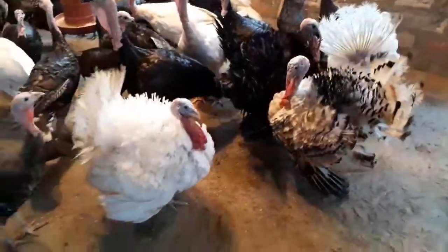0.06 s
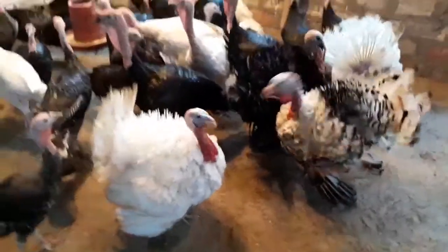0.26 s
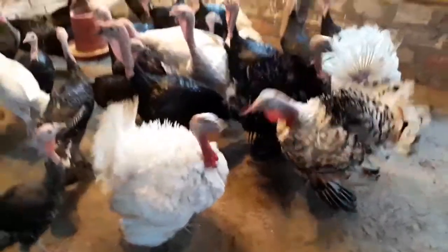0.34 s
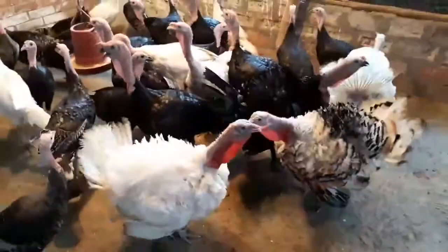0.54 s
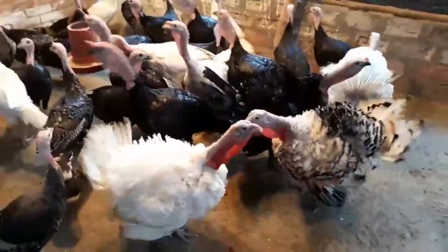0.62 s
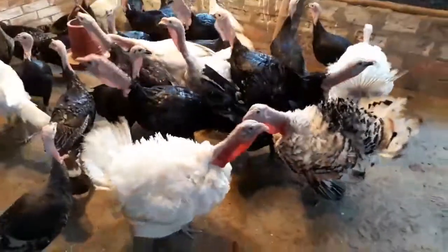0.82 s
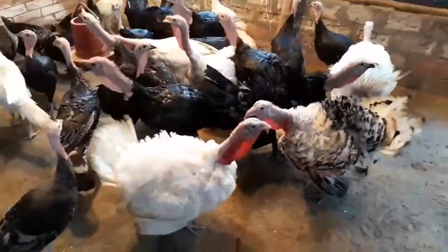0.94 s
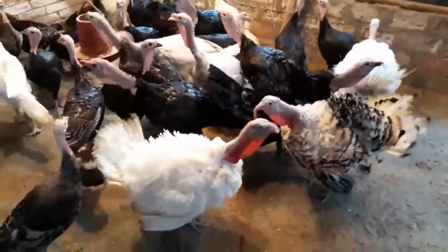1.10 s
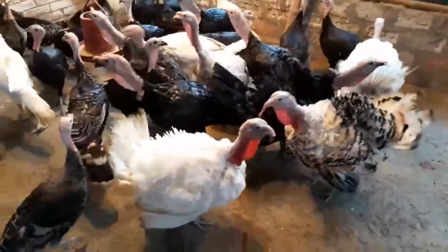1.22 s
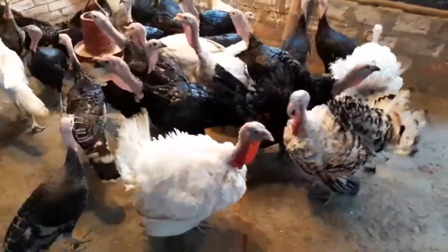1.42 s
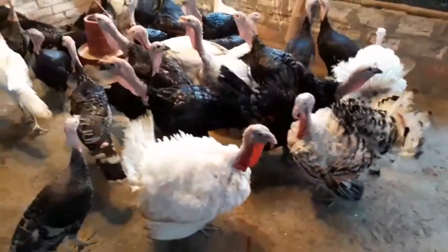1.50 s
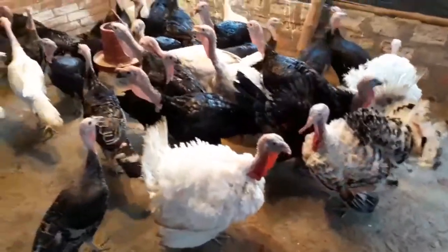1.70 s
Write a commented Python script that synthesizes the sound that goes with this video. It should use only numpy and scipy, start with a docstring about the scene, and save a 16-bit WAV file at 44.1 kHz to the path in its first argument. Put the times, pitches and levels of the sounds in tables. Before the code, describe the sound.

A turkey hen whines softly with tiny peeps, then several toms erupt into fast, nasal, overlapping gobbles with a raspy edge, gradually thinning out and ringing in a hard-walled brick shed, heard from close by.

```python
"""Brick shed with a flock of turkeys. A hen whines softly, then several toms burst into gobbling at once:
short, nasal, overlapping syllables at neighbouring pitches that fade and ring out in the shed.
Toms are gliding harmonic stacks; the flock is many random stacks with breath noise and rasping treble.
Whine and peeps are swept tones; rumble and floor are coloured noise, thuds decaying sines.
The shed's echo is decaying noise in octave bands."""
import sys
import numpy as np
from scipy import signal
from scipy.fft import rfft, irfft
from scipy.io import wavfile

SR = 44100
rng = np.random.default_rng(int(sys.argv[2]) if len(sys.argv) > 2 else 0)


def transcribe(signal):
    """Save signal, clipped to [-1, 1], as a 16-bit WAV file at the path in sys.argv[1]."""
    frames = np.atleast_2d(signal).T
    limited = np.clip(frames, -1, 1)
    pcm = np.round(limited * 32767).astype(np.int16)
    wavfile.write(sys.argv[1], SR, pcm)


N = 77175
TIME_S = np.arange(N) / SR

# Low rumble that swells with the gobbling: start_s, level_db
RUMBLE_LEVEL = [(0, -56), (.15, -52), (.3, -43), (.5, -42), (.9, -43), (1.2, -43), (1.55, -47), (1.75, -54)]
# Rumble spectrum: frequency_hz, relative_level_db
RUMBLE_SPECTRUM = [(15, -45), (25, -19), (49, -20.5), (112, -1.5), (187, -13), (247, -3), (300, -6.5),
                   (335, -9.5), (460, -6.5), (600, -37), (1010, -120)]
# Dull thuds: start_s, pitch_hz, level_db (before the soft onset), t60_s
THUDS = [(.48, 106, -18.5, 0.093), (.915, 250, -22.5, 0.18), (.28, 290, -21.5, 0.17)]
# Spectrum of the shed's faint noise: frequency_hz, relative_level_db
FLOOR_SPECTRUM = [(60, -22), (150, -8.5), (280, -4.5), (460, -12.5), (1100, -11.5), (3100, -29),
                  (7000, -27.5), (15600, -45)]
# Echo decay: frequency_hz, t60_s
SHED_DECAY = [(300, 0.22), (700, 0.47), (1500, 0.46), (4000, 0.46), (12000, 0.2)]
# Hen's whine: start_s, pitch_hz, level_db
WHINE = [(0, 965, -32), (.03, 977, -45), (.07, 953.6, -26), (.11, 969, -45), (.15, 945.6, -22),
         (.162, 924, -48), (.175, 865, -22.5), (.19, 810, -39), (.2, 820, -42)]
# Whistled peeps: centre_s, length_s, pitch_hz, glide_hz_per_s, level_db
PEEPS = [(0.056, 0.028, 1397, 6000, -31.5), (.06, .04, 733, 3000, -46.5), (.06, .1, 2230, 3, -52),
         (.115, 0.02, 1160, 0, -34), (.12, 0.023, 2670, -2, -48), (.197, 0.013, 1552, -4, -25),
         (1.325, 0.024, 3500, 2, -34.5), (1.4, 0.014, 2463, 0, -34.5), (1.52, 0.016, 3460, 4, -40),
         (1.54, 0.027, 1079, 10, -35.5), (1.63, .05, 649.4, 0, -43.5)]
# Flock level, two successive runs: start_s, level_db, treble_relative_db
FLOCK_LEVEL_RUNS = [
    [(0.0, -46, 5), (0.016, -26.5, -24), (0.024, -44.5, -1), (0.06, -26, -27), (0.114, -40.5, 1.5),
     (0.176, -24.5, -25), (0.196, -15.5, -25), (0.224, -32, -12), (0.232, -12, -27), (0.24, -18, -27),
     (0.26, -15.5, -14), (0.308, -10.5, -20.5), (0.316, -10.5, -5.5), (0.34, -13, -3)],
    [(0.35, -23, -16), (0.384, -10, -11), (0.402, -14.5, -3.5), (0.548, -10, -7), (0.568, -9, -6),
     (0.582, -14, -14), (0.61, -6.5, -12.5), (0.848, -9.5, -13.5), (1.114, -14.5, -23.5),
     (1.22, -13, -25.5), (1.262, -28, -8), (1.28, -19.5, -19.5), (1.424, -22.5, -23.5), (1.456, -20.5, -35),
     (1.512, -31.5, -21), (1.62, -49, -26)],
]
# Spectrum of the flock's voices: frequency_hz, relative_level_db
FLOCK_SPECTRUM = [(450, -34), (560, -7.5), (700, -2.5), (950, 2), (1200, -0.5), (1500, -9.5), (1750, -14),
                  (2100, -8.5), (2800, -28.5), (4000, -40)]
# Spectral shaping of the rasp: frequency_hz, relative_level_db
RASP_SPECTRUM = [(1530, -6.5), (2600, 2), (3280, -11), (3990, 6.5), (4990, -4.5), (5380, 0), (7370, -17.5),
                 (15600, -34)]
# Clearest gobble syllables: centre_s, length_s, pitch_hz, glide_hz_per_s,
# fundamental_db, harmonic_2_db, harmonic_3_db, upper_harmonics_db
SYLLABLES = [(0.19, 0.03, 602, -2, -27.5, -50, -37, -50), (0.235, 0.025, 891, 998, -23, -38, -38, -67),
             (0.238, 0.03, 984, 700, -23, -28, -42, -65), (0.25, 0.035, 702, 500, -49, -26, -23.5, -45),
             (0.282, 0.025, 998, -1500, -24, -17.5, -57, -31),
             (0.283, 0.03, 838.5, -3000, -35, -16, -36, -55), (0.305, 0.025, 774, -2500, -45, -9, -23, -33),
             (0.315, 0.03, 1068, -2000, -14.5, -27, -52, -32),
             (0.315, 0.025, 710, -2500, -49, -16, -43, -59),
             (0.33, 0.04, 900.6, -9000, -13, -19, -49, -28.5),
             (0.335, 0.025, 820, -1000, -19.5, -38, -27.5, -37),
             (0.35, 0.035, 742, -2500, -17, -39, -45, -31.5),
             (0.375, 0.03, 768, -1000, -30, -29, -41, -34.5),
             (0.395, 0.035, 594.7, -400, -33, -25.5, -27, -35),
             (0.407, 0.025, 727.6, 400, -13, -18.5, -27, -48),
             (0.414, 0.03, 684.2, 1404, -14.5, -14.5, -21.5, -26.5),
             (0.438, 0.02, 685.8, -2, -10, -35, -12.5, -46), (0.449, 0.03, 588, 200, -19, -46, -24, -38),
             (0.45, 0.035, 754, 1200, -20.5, -22, -26.5, -28),
             (0.45, 0.045, 701, 696, -12.5, -27, -24, -55),
             (0.495, 0.03, 663.4, -200, -16.5, -25, -24, -52), (0.496, 0.045, 766, 804, -21, -17, -28, -34),
             (0.504, 0.06, 701, 200, -17.5, -24, -34, -35),
             (0.54, 0.045, 767.2, 308, -15.5, -20.5, -26.5, -30),
             (0.564, 0.025, 682.4, 0, -8.5, -18, -28, -50),
             (0.562, 0.045, 597.6, -100, -28.5, -20.5, -40, -35),
             (0.596, 0.025, 579, -1200, -44, -16, -22.5, -33),
             (0.611, 0.035, 682, 1000, -21, -17, -16.5, -51), (0.614, 0.03, 642, 0, -13.5, -13, -20.5, -39),
             (0.639, 0.07, 751.5, 204, -40, -21.5, -36, -51),
             (0.647, 0.045, 681.5, -300, -10.5, -27, -27, -33.5),
             (0.661, 0.025, 895, 404, -28, -17, -49, -29),
             (0.692, 0.045, 698.8, 498, -8.5, -19.5, -19.5, -36.5),
             (0.731, 0.065, 747, -2, -22, -26.5, -32, -42.5),
             (0.737, 0.03, 849.7, -1800, -11.5, -27, -51, -40),
             (0.761, 0.03, 559.3, 2105, -27.5, -15, -46, -36),
             (0.798, 0.04, 576, -500, -36, -15.5, -49, -39), (0.801, 0.045, 658, 12, -14, -22, -23, -53),
             (0.842, 0.04, 705.7, 605, -18.5, -22, -27, -58), (0.852, 0.035, 593, 400, -53, -20, -35, -70),
             (0.853, 0.06, 653.6, 892, -12, -19, -18.5, -32.5),
             (0.88, 0.025, 591, -2000, -20.5, -33, -46, -38.5),
             (0.883, 0.03, 769, 1202, -18, -21, -51, -34), (0.885, 0.05, 674, 5, -19, -22, -26, -37),
             (0.911, 0.04, 610, 1200, -25, -22, -29, -40),
             (0.92, 0.035, 657.3, -1100, -19.5, -43, -24, -50),
             (0.958, 0.05, 723, 1200, -27, -17.5, -30, -47), (0.96, 0.045, 680.4, 500, -27, -18, -31, -37),
             (0.985, 0.05, 661, 1200, -23.5, -30, -35, -73), (1.013, 0.035, 750, 300, -20.5, -26, -34, -62),
             (1.022, 0.03, 629.7, 408, -15, -33, -53, -37.5), (1.085, 0.03, 685, 303, -18.5, -45, -46, -44),
             (1.088, 0.035, 576, 600, -15.5, -27, -53, -45), (1.13, 0.03, 749, 0, -26, -41, -54, -62),
             (1.159, 0.03, 685.3, -100, -20.5, -50, -26.5, -39.5),
             (1.173, 0.06, 592, -300, -18, -20, -59, -41.5),
             (1.216, 0.045, 658.5, -1500, -18, -50, -55, -43.5), (1.255, 0.03, 685, -3, -38, -44, -48, -50),
             (1.28, 0.025, 688, -800, -20, -50, -44, -60), (1.299, 0.04, 576, -400, -20.5, -30.5, -57, -47),
             (1.304, 0.03, 775, -1700, -18.5, -33, -50, -69), (1.332, 0.03, 554, -1000, -28, -40, -37, -48),
             (1.334, 0.045, 666, -1100, -24, -34, -43, -58), (1.39, 0.04, 606, -2, -47, -29, -61, -51.5),
             (1.442, 0.03, 568, -500, -25, -35, -69, -71),
             (1.457, 0.025, 659.4, -1200, -15, -60, -29.5, -46),
             (1.473, 0.035, 576, -8, -25.5, -32.5, -72.5, -49.5),
             (1.5, 0.045, 651, -300, -40, -59, -46, -53.5), (1.519, 0.025, 572.5, -400, -40, -37, -44, -55)]
# Throat colour of harmonics 4 and up: frequency_hz, relative_level_db
THROAT_SPECTRUM = [(2000, 19.5), (2800, -4), (4000, -1.5), (5400, -5), (7000, -16), (9000, -21),
                   (15500, -30)]

FLOOR_DB, SHED_DB, SHED_GAP_S = -54, -8, 0.0094
THUD_ONSET_S = 0.018
RISE_PER_LENGTH, FALL_PER_LENGTH = 0.6, 0.82
WHINE_JITTER_RATIO, WHINE_SHIMMER_DB, WHINE_OVERTONES_DB = 0.008, 1.5, -26
WHINE_FADE_S = 0.023
FLOCK_PITCH_HZ, FLOCK_SAG_HZ_PER_S, FLOCK_PITCH_LOG_SPREAD = 759.8, 110, 0.14
FLOCK_RATE_PER_S, FLOCK_SYLLABLE_S, FLOCK_GLIDE_SPREAD_HZ_PER_S = 70, 0.04, 1000
FLOCK_VOICES_DB, FLOCK_SPREAD_DB, FLOCK_FADE_S = -9, 2.5, 0.05
VOICE_BREATH_RATIO, RASP_BREATH_RATIO = 0.45, 0.45
RASP_DB, RASP_FLUTTER_DB, RASP_FLUTTER_HZ = -7, 2.5, 4.2
GRIT_DB, GRIT_HZ = 3, 150
JITTER_RATIO, SHIMMER_DB, SHIMMER_HZ, UPPER_SCATTER_DB = 0.006, 1.8, 90, 3
THROAT_LOW_HZ, BASS_CUT_HZ, TOP_CUT_HZ = 500, 25, 15750
PEAK_LIMIT = 0.92


def from_db(db):
    """Decibels to gain."""
    return 10 ** (np.asarray(db) / 20)


def rms_one(x):
    """Scale to rms 1."""
    return x / np.sqrt(np.mean(x ** 2) + 1e-20)


def in_time(rows):
    """Interpolate each table column to a curve per sample."""
    start_s, *columns = np.transpose(rows)
    return [np.interp(TIME_S, start_s, column) for column in columns]


def at_hz(points, hz):
    """Interpolate a spectrum or decay table on a log-frequency axis."""
    points_hz, values = np.transpose(points)
    return np.interp(np.log(hz), np.log(points_hz), values)


def coloured(x, spectrum):
    """Shape by a spectrum; rms 1."""
    hz = np.arange(N // 2 + 1) * SR / N + 1   # +1 avoids log(0)
    return rms_one(irfft(rfft(x) * from_db(at_hz(spectrum, hz)), N))


def drift(rate_hz):
    """Random modulation: noise through a two-pole low-pass; rms 1."""
    pole = np.exp(-2 * np.pi * rate_hz / SR)
    noise = rng.standard_normal(N + 8000)
    return rms_one(signal.lfilter([1], [1, -2 * pole, pole * pole], noise)[8000:])   # skip settling


def add_note(out, centre_s, length_s, pitch_hz, glide_hz_per_s, harmonics_db, wobble, phase_rad):
    """Add a gliding harmonic stack: quick swell, slower fade."""
    rise_s = RISE_PER_LENGTH * length_s
    fall_s = FALL_PER_LENGTH * length_s
    first = max(int((centre_s - rise_s) * SR), 0)
    last = min(int((centre_s + fall_s) * SR), N)
    i = np.arange(first, last)
    t = i / SR - centre_s
    hz = (pitch_hz + glide_hz_per_s * t) * (1 + wobble[i])
    phase = 2 * np.pi * np.cumsum(hz) / SR + phase_rad
    swell = np.cos(np.pi / 2 * np.where(t < 0, t / rise_s, t / fall_s)) ** 2
    k = np.arange(1, len(harmonics_db) + 1)[:, None]
    partials = from_db(harmonics_db)[:, None] * np.sin(k * phase + k * k)   # k*k staggers phases
    out[i] += np.sqrt(2) * swell * np.sum(partials, axis=0)


def floor_noise():
    """Faint steady noise of the shed: coloured noise."""
    return from_db(FLOOR_DB) * coloured(rng.standard_normal(N), FLOOR_SPECTRUM)


def rumble():
    """Low rumble that swells with the gobbling: coloured noise of varying level."""
    level_db, = in_time(RUMBLE_LEVEL)
    return from_db(level_db) * coloured(rng.standard_normal(N), RUMBLE_SPECTRUM)


def thuds():
    """Dull thuds: soft-onset sines with exponential decay."""
    out = np.zeros(N)
    for start_s, pitch_hz, level_db, t60_s in THUDS:
        age_s = np.maximum(TIME_S - start_s, 0)
        onset = 1 - np.exp(-age_s / THUD_ONSET_S)
        out += from_db(level_db - 60 * age_s / t60_s) * onset * np.sin(2 * np.pi * pitch_hz * age_s)
    return out


def shed(x):
    """Diffuse echo: octave bands of noise, each with its own decay."""
    t = np.arange(SR) / SR
    tail = np.zeros(SR)
    for low_hz in 177 * 2. ** np.arange(7):
        edges_hz = [low_hz, min(2 * low_hz, 20000)]
        band_filter = signal.butter(2, edges_hz, "band", fs=SR, output="sos")
        band = signal.sosfilt(band_filter, rng.standard_normal(SR))
        t60_s = at_hz(SHED_DECAY, low_hz * np.sqrt(2))
        tail += band * from_db(-60 * t / t60_s)
    tail *= np.clip(t / SHED_GAP_S - 1, 0, 1)   # silent gap, then equally long ramp
    return signal.fftconvolve(x, tail / np.sqrt(np.sum(tail ** 2)))[:N]


def whine(wobble):
    """Hen's soft whine: wavering tone with faint overtones falling as 1/k."""
    pitch_hz, level_db = in_time(WHINE)
    phase = 2 * np.pi * np.cumsum(pitch_hz * (1 + wobble)) / SR
    overtones = sum(np.sin(k * phase) / k for k in range(2, 15))
    tone = np.sin(phase) + from_db(WHINE_OVERTONES_DB) * overtones
    end_s = WHINE[-1][0]
    fade = np.clip((end_s - TIME_S) / WHINE_FADE_S, 0, 1)
    return fade * np.sqrt(2) * from_db(level_db) * tone


def peeps(wobble):
    """Whistled peeps: short single partials."""
    out = np.zeros(N)
    for centre_s, length_s, pitch_hz, glide_hz_per_s, level_db in PEEPS:
        add_note(out, centre_s, length_s, pitch_hz, glide_hz_per_s, np.array([level_db]), wobble, 0)
    return out


def hens():
    """Whine and peeps sharing one pitch wobble and one level shimmer."""
    wobble = WHINE_JITTER_RATIO * drift(112)
    return (whine(wobble) + peeps(wobble)) * from_db(WHINE_SHIMMER_DB * drift(89))


def flock_syllables():
    """Harmonic stacks of random moment, pitch, glide and level; rms 1."""
    out = np.zeros(N)
    wobble = JITTER_RATIO * drift(162)
    for n, (time_draw, pitch_draw, glide_draw, level_draw) in enumerate(rng.standard_normal((300, 4))):
        centre_s = (n + time_draw) / FLOCK_RATE_PER_S
        if 0 < centre_s < N / SR:
            sagged_hz = FLOCK_PITCH_HZ - FLOCK_SAG_HZ_PER_S * centre_s
            pitch_hz = sagged_hz * np.exp(FLOCK_PITCH_LOG_SPREAD * pitch_draw)
            glide_hz_per_s = FLOCK_GLIDE_SPREAD_HZ_PER_S * glide_draw
            harmonics_db = np.full(int(15500 / pitch_hz), FLOCK_SPREAD_DB * level_draw)
            own_wobble = np.roll(wobble, int(N * level_draw))
            add_note(out, centre_s, FLOCK_SYLLABLE_S, pitch_hz, glide_hz_per_s,
                     harmonics_db, own_wobble, 9 * glide_draw)
    return rms_one(out)


def flock():
    """Massed syllables with breath noise; their treble rasps and flutters."""
    level_db, treble_db = in_time(np.vstack(FLOCK_LEVEL_RUNS))
    syllables = flock_syllables()
    breathy = syllables + VOICE_BREATH_RATIO * rng.standard_normal(N)
    voices = coloured(breathy, FLOCK_SPECTRUM)
    breathy_rasp = syllables + RASP_BREATH_RATIO * rng.standard_normal(N)
    flutter_db = RASP_FLUTTER_DB * drift(RASP_FLUTTER_HZ) + GRIT_DB * drift(GRIT_HZ)
    rasp = coloured(breathy_rasp, RASP_SPECTRUM) * from_db(treble_db + RASP_DB + flutter_db)
    end_s = FLOCK_LEVEL_RUNS[-1][-1][0]
    fade = np.interp(TIME_S, [end_s - FLOCK_FADE_S, end_s], [1, 0])
    return fade * from_db(level_db) * (from_db(FLOCK_VOICES_DB) * voices + rasp)


def toms():
    """Near gobbles: harmonic stacks, each with its own waver, under a common quick shimmer."""
    out = np.zeros(N)
    wobble = JITTER_RATIO * drift(107)
    for syllable, draw in zip(SYLLABLES, rng.standard_normal((200, 30))):
        centre_s, length_s, pitch_hz, glide_hz_per_s, *low_db, upper_db = syllable
        upper_hz = np.arange(4, int(15000 / pitch_hz)) * pitch_hz
        scatter_db = UPPER_SCATTER_DB * draw[:len(upper_hz)]
        throat_db = upper_db + at_hz(THROAT_SPECTRUM, upper_hz) + scatter_db
        own_wobble = np.roll(wobble, int(N * draw[-1]))
        add_note(out, centre_s, length_s, pitch_hz, glide_hz_per_s,
                 np.r_[low_db, throat_db], own_wobble, 9 * draw[-2])
    return out * from_db(SHIMMER_DB * drift(SHIMMER_HZ))


def scene():
    """Background, high-passed birds and their echo in the shed."""
    background = floor_noise() + rumble() + thuds()
    high_pass = signal.butter(4, THROAT_LOW_HZ, "high", fs=SR, output="sos")
    birds = signal.sosfilt(high_pass, hens() + flock() + toms())
    return (background + birds + from_db(SHED_DB) * shed(birds))[None]


def record(dry):
    """Round off peaks; cut the deepest bass and the top."""
    rounded = dry / (1 + (dry / PEAK_LIMIT) ** 8) ** .125
    bass_cut = signal.butter(2, BASS_CUT_HZ, "high", fs=SR, output="sos")
    top_cut = signal.ellip(12, .5, 70, TOP_CUT_HZ, fs=SR, output="sos")
    return signal.sosfilt(top_cut, signal.sosfilt(bass_cut, rounded))


dry = scene()
out = record(dry)
transcribe(out)
```